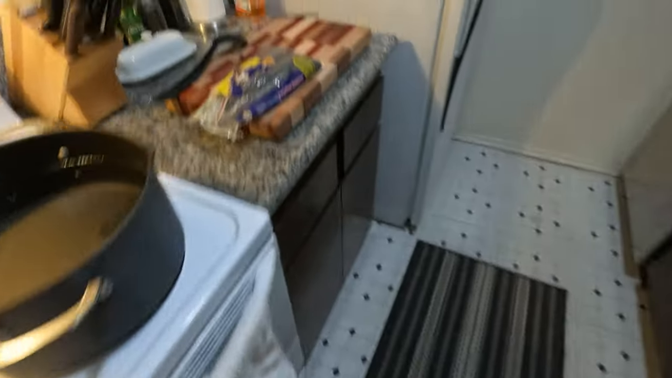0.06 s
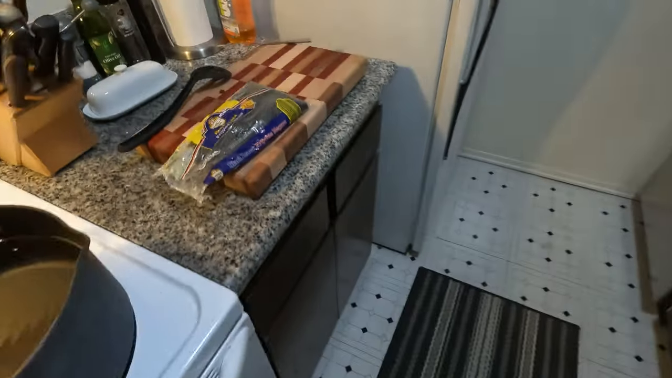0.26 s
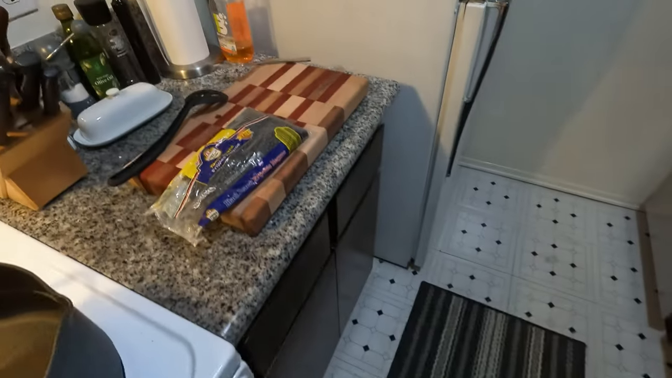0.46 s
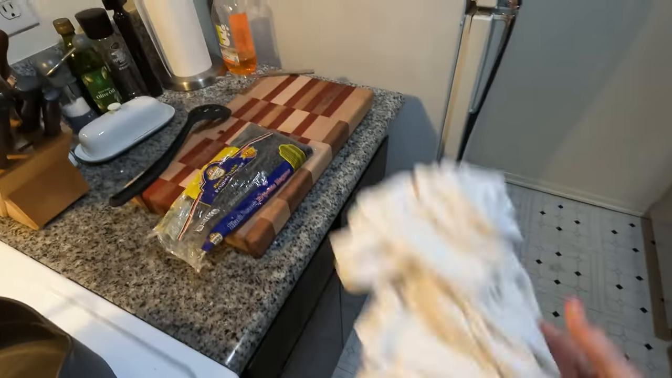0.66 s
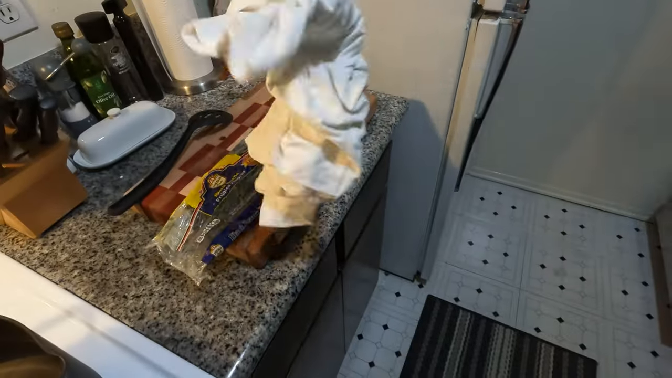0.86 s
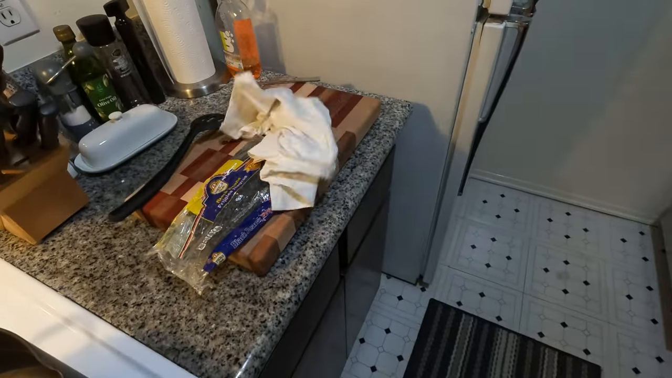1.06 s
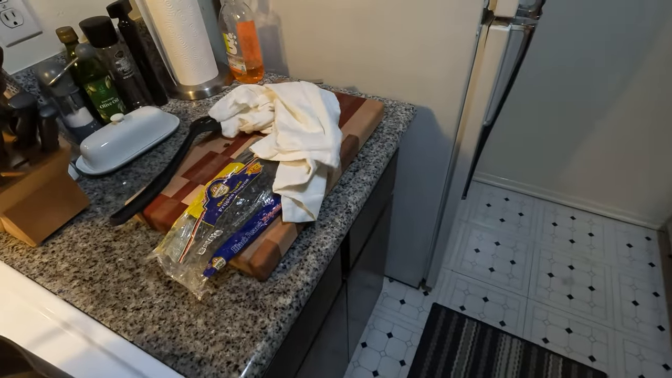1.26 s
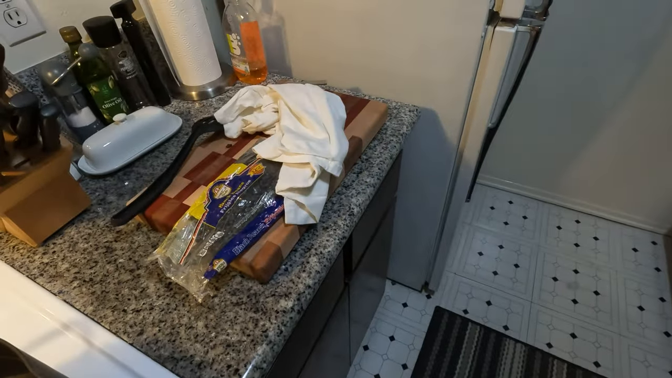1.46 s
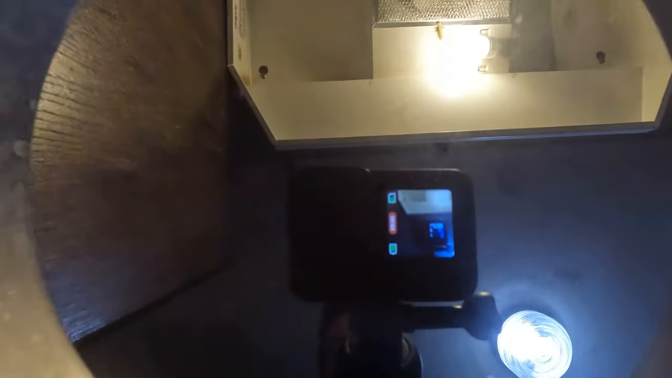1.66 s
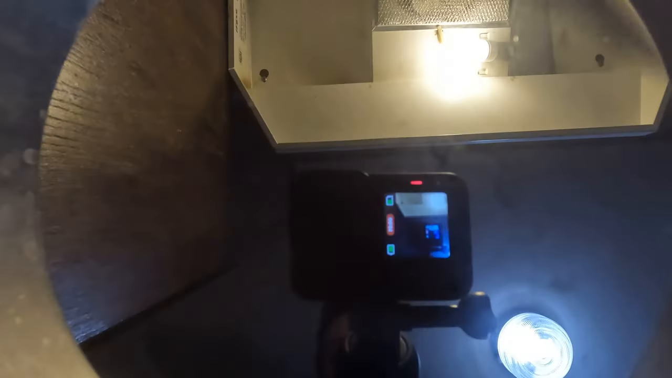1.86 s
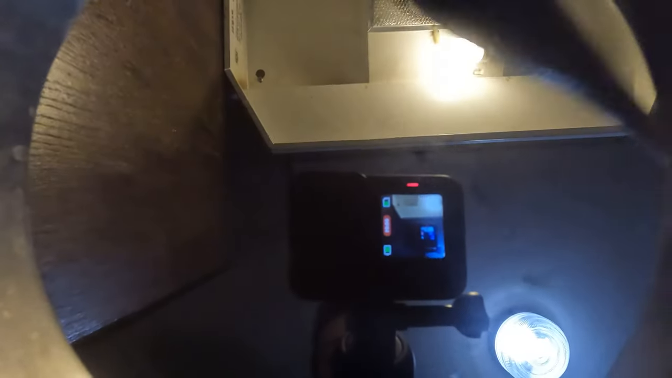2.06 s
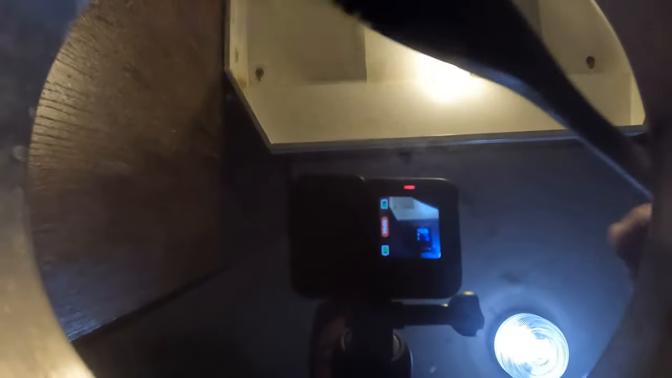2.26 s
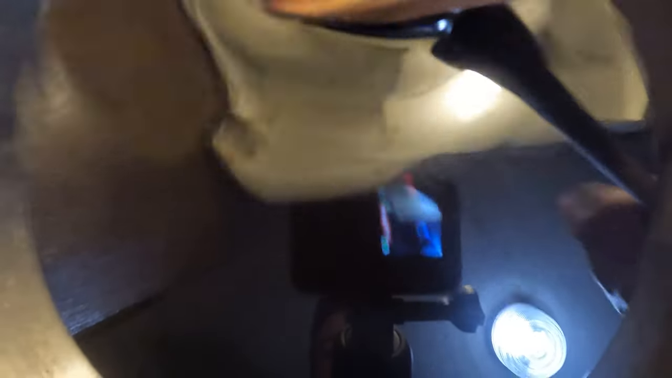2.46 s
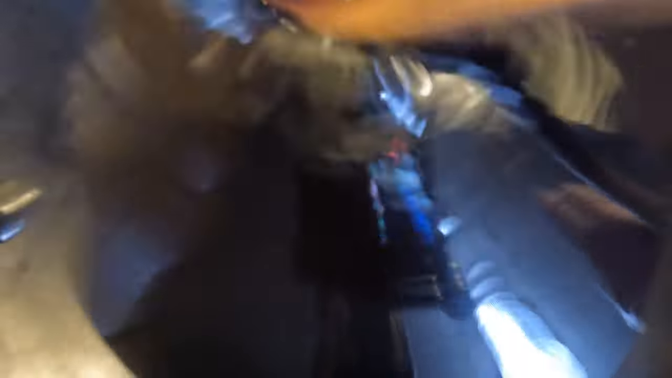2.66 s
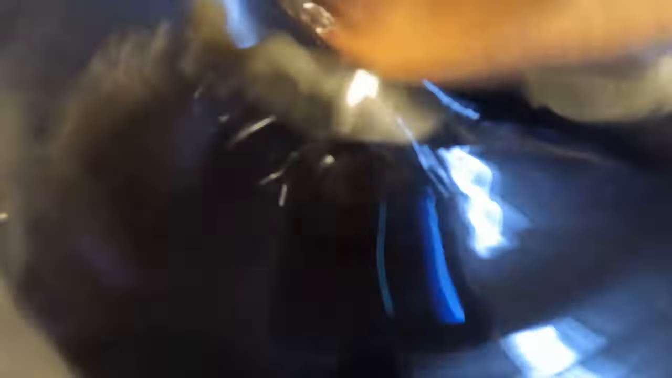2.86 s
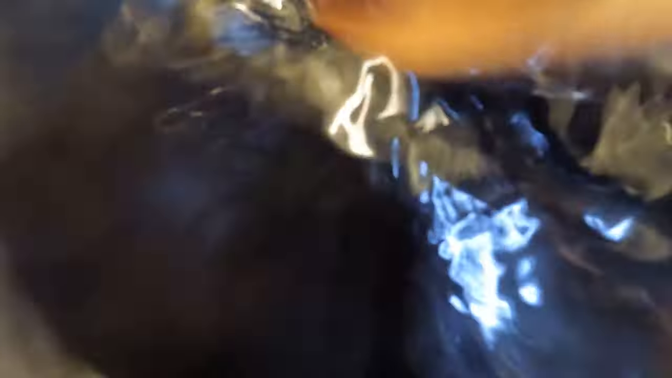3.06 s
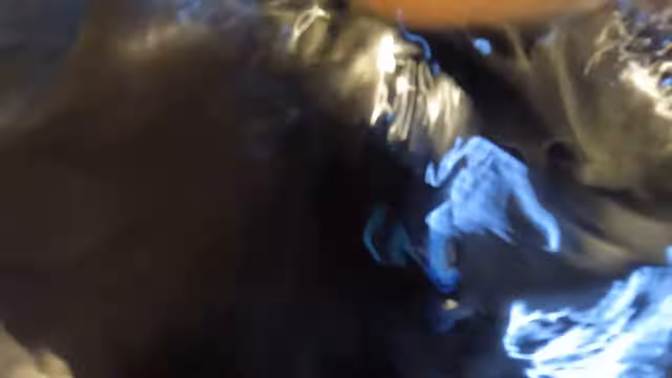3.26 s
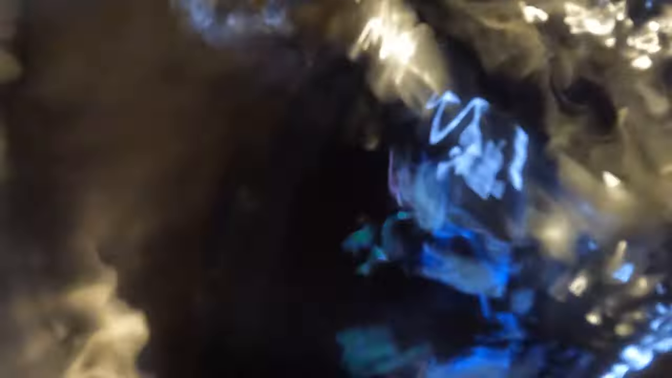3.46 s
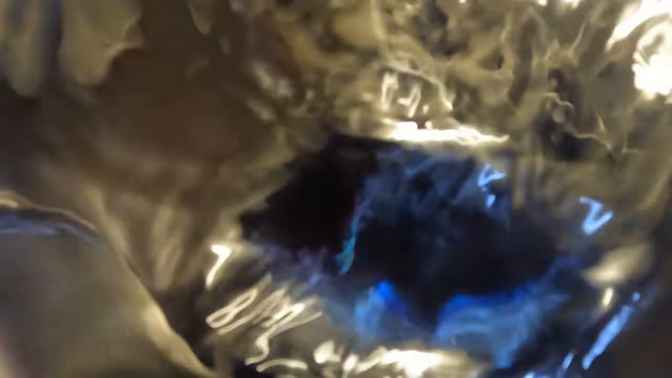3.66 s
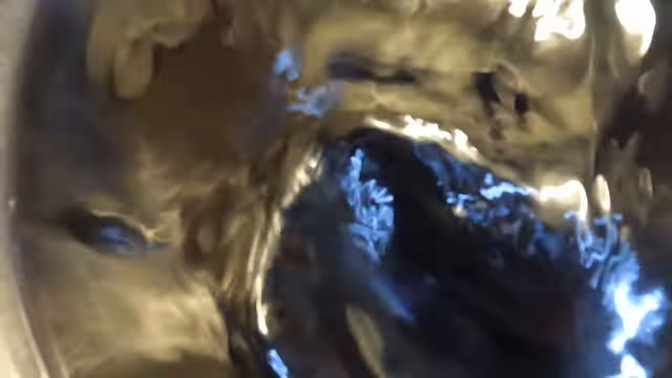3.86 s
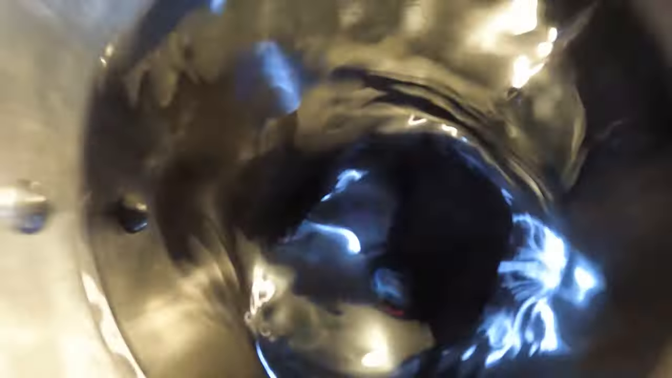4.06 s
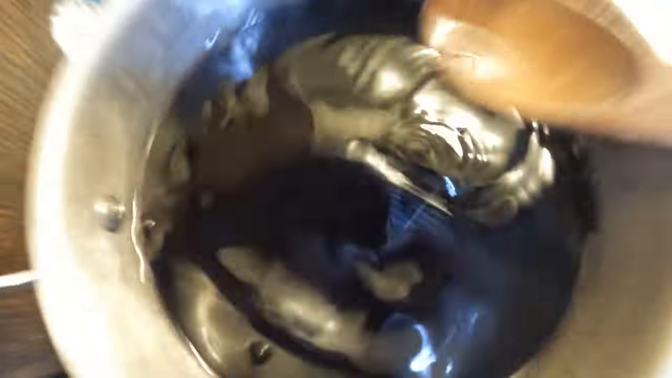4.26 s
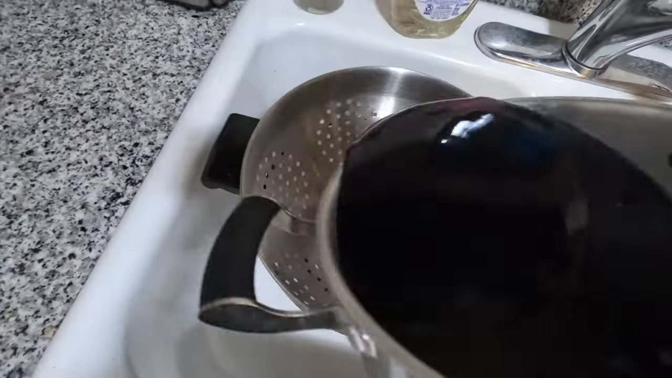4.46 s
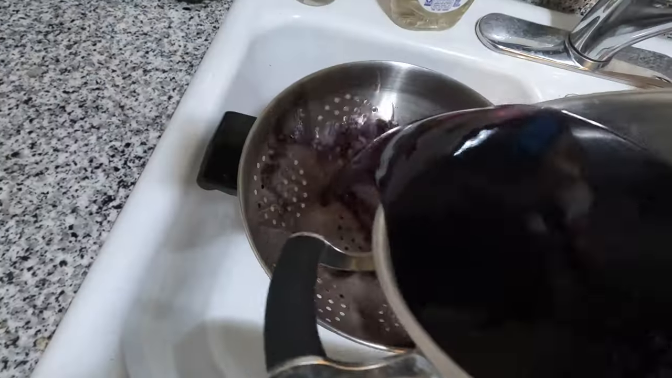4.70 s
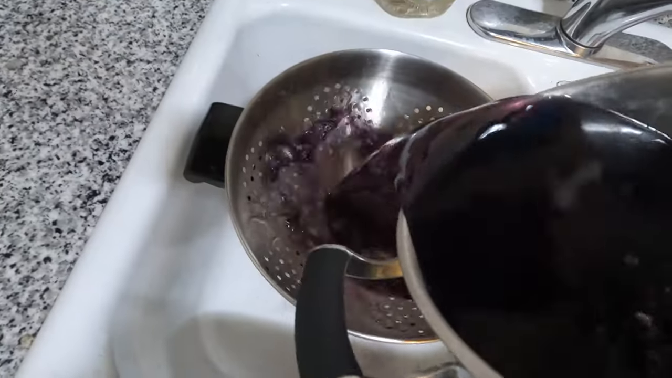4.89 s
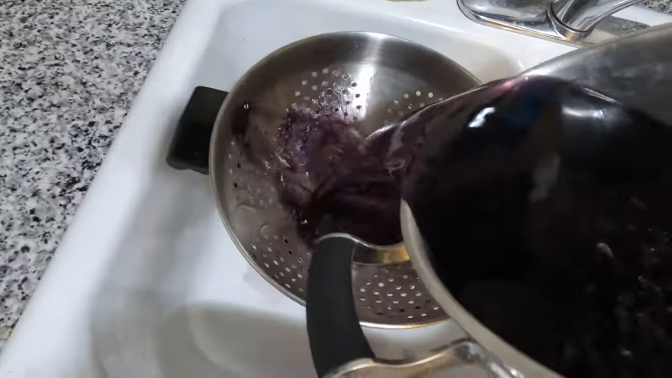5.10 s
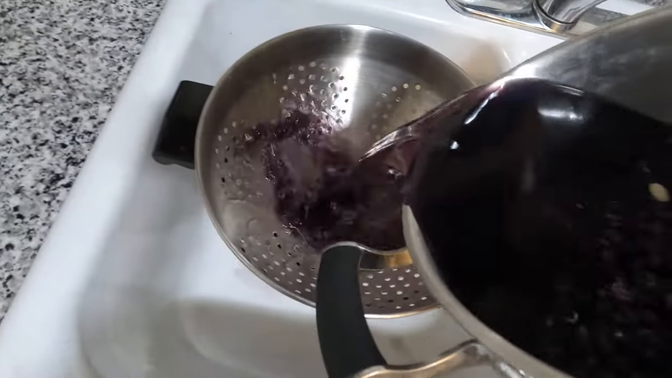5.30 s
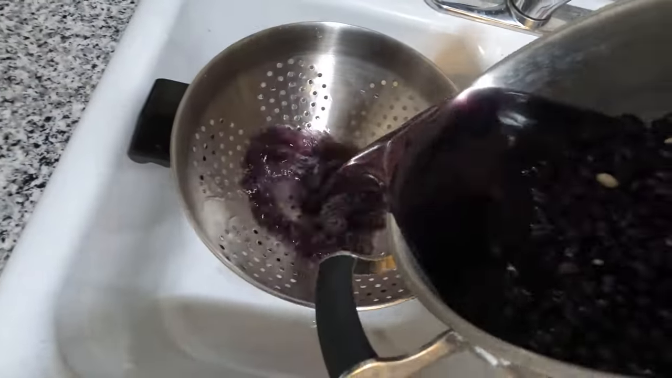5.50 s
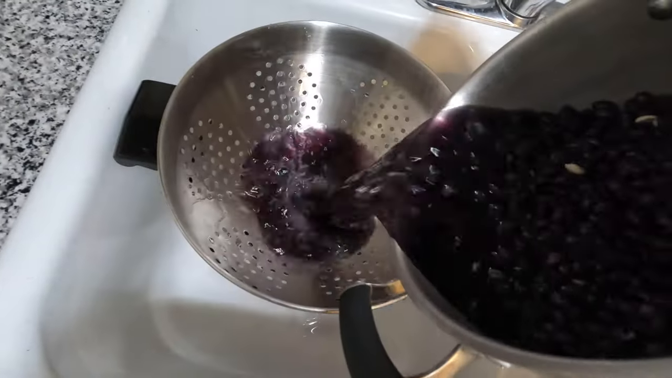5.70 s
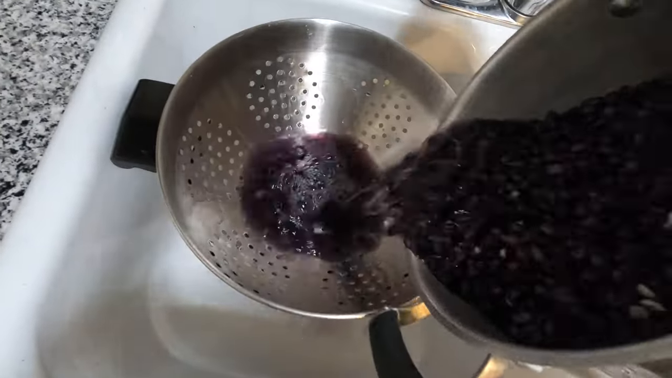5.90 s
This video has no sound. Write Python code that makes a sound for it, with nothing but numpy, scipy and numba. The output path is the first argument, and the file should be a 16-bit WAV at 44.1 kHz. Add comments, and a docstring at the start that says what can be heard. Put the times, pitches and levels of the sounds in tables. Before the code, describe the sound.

A towel slaps and thumps onto a kitchen counter, then a growing fan drone with watery plips inside a pot, then dark water pours through a steel colander.

```python
"""A kitchen in three moments, joined abruptly.
First a towel is tossed: cloth slaps and plastic crinkles (click clouds), a thumping board (decaying modes).
Then, inside a pot, a fan drone grows (coloured noise) while water plips (gliding sines) in soft fizz.
Last, after a faint click, the pot clanks on a steel colander (decaying modes) and bean water pours through
into the sink: swarms of ringing bubbles make the splash, the spray and the deep gulps of the stream."""
import sys
import numpy as np
from scipy import signal
from scipy.fft import rfft, irfft, next_fast_len
from scipy.io import wavfile
from scipy.ndimage import uniform_filter1d, map_coordinates
from numba import njit

SR = 44100
rng = np.random.default_rng(int(sys.argv[2]) if len(sys.argv) > 2 else 0)


def generate_wav(signal):
    """Clip the signal to [-1, 1] and save it as 16-bit WAV at the path in sys.argv[1]."""
    frames = np.transpose(np.atleast_2d(signal))
    scaled = np.clip(frames, -1, 1) * 32767
    pcm = np.round(scaled).astype(np.int16)
    wavfile.write(sys.argv[1], SR, pcm)


N = 261839
T = np.arange(N) / SR
POT_S, SINK_S = 1.652, 4.42  # the listening place moves into the pot, then to the sink


def amp(db):
    """Decibels to linear gain."""
    return 10 ** (np.asarray(db) / 20)


def unit(x):
    """Scale to an RMS of 1."""
    return x / np.sqrt(np.mean(x ** 2))


def noise(*channels):
    """White noise over the whole scene."""
    return rng.standard_normal((*channels, N))


def add(track, start_s, sound):
    """Mix a sound into a track at start_s."""
    i = max(int(start_s * SR), 0)
    track[i:i + len(sound)] += sound[:N - i]


def colour(x, points, peaks=()):
    """Filter by (Hz, dB) points, 36 dB/octave outside them, with resonances (Hz, width Hz, dB) on top."""
    size = next_fast_len(N + SR // 2, True)
    f = np.fft.rfftfreq(size, 1 / SR) + 0.00107  # keeps the log finite at 0 Hz
    hz, db = np.transpose(sorted(points))
    shape_db = np.interp(np.log(f), np.log(hz), db)
    octaves_outside = np.maximum(np.log2(hz[0] / f), np.log2(f / hz[-1]))
    shape_db -= 36 * np.maximum(0, octaves_outside)
    for centre_hz, width_hz, lift_db in peaks:
        shape_db += lift_db / (1 + (2 * (f - centre_hz) / width_hz) ** 2)
    return irfft(rfft(x, size) * amp(shape_db), size)[..., :N]


def decay(t, t60_s):
    """Exponential decay by 60 dB in t60_s."""
    return np.exp(-np.log(1000) * t / t60_s)


def swell(rise_s, t60_s):
    """Time axis and envelope of a sound that rises smoothly and dies away."""
    t = T[:int(SR * (1.2 * t60_s + rise_s))]
    return t, (1 - np.exp(-t / rise_s)) ** 2 * decay(t, t60_s)


def ramp(start_s, length_s):
    """Rise linearly from 0 to 1 over length_s."""
    return np.clip((T - start_s) / length_s, 0, 1)


def wander(hz):
    """Slow chance: random points at rate hz, joined by lines, with a spread near 1."""
    return 1.2 * np.interp(T * hz, np.arange(2000), rng.standard_normal(2000))


def bend(x, ratio):
    """Bend the pitch of a stereo sound by a changing playback ratio."""
    position = np.cumsum(ratio)
    return np.array([map_coordinates(side, [position], mode="mirror") for side in x])


def room(x, wet_db, t60, near_db, near_t60):
    """Close reflections and a longer, duller tail; they differ left and right except in the bass."""
    t = T[:SR * 3 // 4]
    mid, side = rng.standard_normal((2, len(t)))
    side = signal.sosfilt(signal.butter(2, 330, "high", fs=SR, output="sos"), side)
    pair = np.array([mid + side, mid - side]) / np.sqrt(2) * (t > .0012)
    near, tail = decay(t, near_t60), decay(t, t60)
    near, tail = near / np.linalg.norm(near), tail / np.linalg.norm(tail)
    dull_tail = signal.sosfilt(signal.butter(1, 6000, fs=SR, output="sos"), pair * tail)
    echo = amp(near_db) * pair * near + amp(wet_db) * dull_tail
    return x + signal.fftconvolve(np.atleast_2d(x), echo, axes=1)[:, :N]


def bursts(table, grain_db, spread):
    """Each row (s, dB, Hz, rise s, t60 s) is a quick cloud of tiny clicks around its own pitch."""
    out = np.zeros(N)
    for start_s, db, hz, rise_s, t60_s in table:
        t, envelope = swell(rise_s, t60_s)
        grain_gain = np.repeat(amp(grain_db * rng.standard_normal(SR // 49)), 49)
        clicks = rng.standard_normal(SR) * grain_gain
        edges = [hz / (1 + spread), min(hz * (1 + spread), SR * .45)]
        band = signal.butter(2, edges, "band", fs=SR, output="sos")
        cloud = unit(signal.sosfilt(band, clicks))
        add(out, start_s, amp(db) * np.resize(cloud, len(t)) * envelope)
    return out


def tones(table, rise, glide):
    """Each resonance (s, Hz, dB, t60 s) is a decaying sine; its pitch shifts by the share glide over t60."""
    out = np.zeros(N)
    for start_s, hz, db, t60_s in table:
        t, envelope = swell(rise, t60_s)
        add(out, start_s, amp(db) * envelope * np.sin(2 * np.pi * hz * t * (1 + glide * t / t60_s / 2)))
    return out


@njit
def ring_grains(start, hz, t60, size, glide):
    """Many short decaying sines whose pitch rises as they fade."""
    y = np.zeros(N)
    for k in range(len(start)):
        n = int(t60[k] * SR)
        w = 2 * np.pi * hz[k] / SR
        p, bend, z = np.exp(-6.9 / n + 1j * w), np.exp(1j * w * glide / n), size[k] + 0j
        for i in range(start[k], min(start[k] + n, N)):
            z *= p
            p *= bend
            y[i] += z.imag
    return y


def bubbles(rate, low_hz, high_hz, cycles, scatter_db, glide):
    """Bubbles of all sizes at random times, each ringing for a similar number of cycles."""
    when, pitch, strength, length = rng.random((int(rate * N / SR), 4)).T
    hz = low_hz * (min(high_hz, SR / 3) / low_hz) ** pitch
    size = hz * amp(scatter_db * np.minimum(-np.log(strength), 4))
    t60_s = cycles * (.5 + length) / hz
    return unit(ring_grains((when * N).astype(np.int64), hz, t60_s, size, glide))


def swarm(rate, low_hz, high_hz, cycles, scatter_db, glide, width):
    """Bubbles across the basin reach the two microphones with unlike strength and sign."""
    mid, side = (bubbles(rate / 2, low_hz, high_hz, cycles, scatter_db, glide) for _ in range(2))
    return np.array([mid + width * side, mid - width * side])


# kitchen hum spectrum: pitch_hz, relative_db_per_hz
HUM_SPECTRUM = [(50, -1), (85, 3), (142, -3), (219, 2), (302, -9.5), (455, -7), (541, -16.5), (615, -13),
                (868, -22), (1030, -19), (1120, -20.5), (2100, -31.5), (7630, -44.5), (8600, -52.5),
                (12500, -55.5), (14500, -83)]
HUM_DB = -39.5


def kitchen_hum():
    """Steady coloured noise in a hard-walled room."""
    hum = room(colour(noise(), HUM_SPECTRUM), wet_db=-19.0, t60=0.27, near_db=-11.0, near_t60=0.097)
    return amp(HUM_DB) * unit(hum)


# fan rumble spectrum: pitch_hz, relative_db_per_hz
FAN_RUMBLE = [(15, -49), (25, -7.5), (70, -9), (82, -9.5), (102, 0), (206, -4), (244, -1.5), (270, -13.5),
              (305, -10), (332, -5.5), (356, -12.5), (501, -11), (605, -25), (694, -17), (1500, -40.5),
              (1950, -74), (3300, -120)]
# fan hiss spectrum: pitch_hz, relative_db_per_hz
FAN_HISS = [(590, -20), (1000, -3), (1770, -9.5), (1960, -8.5), (2370, -12), (2650, -11), (8120, -32),
            (11100, -46), (12300, -33), (14500, -63)]
RUMBLE_DB, RUMBLE_FULL_S, RUMBLE_GROWTH_DB_PER_S = -38.5, 3.55, 8.5
HISS_DB, HISS_GROWTH_DB_PER_S, HISS_FLOOR_DB = -57.5, 8, -77.5


def fan_drone():
    """Noise heard in the pot: the rumble grows, then holds; the hiss grows out of its floor."""
    rumble_db = RUMBLE_DB - RUMBLE_GROWTH_DB_PER_S * np.maximum(RUMBLE_FULL_S - T, 0)
    hiss_db = HISS_DB - HISS_GROWTH_DB_PER_S * np.maximum(SINK_S - T, 0)
    rumble = amp(rumble_db) * unit(colour(noise(), FAN_RUMBLE))
    hiss = np.hypot(amp(HISS_FLOOR_DB), amp(hiss_db)) * unit(colour(noise(), FAN_HISS))
    return rumble + hiss


SINK_AIR_DB = -50


def sink_air():
    """The fan's hiss as it reaches the sink, independent left and right."""
    return amp(SINK_AIR_DB) * unit(colour(noise(2), FAN_HISS))


# drumming sink spectrum: pitch_hz, relative_db_per_hz
SINK_SPECTRUM = [(20, -20), (45, -1.5), (70, -11.5), (102, 5), (130, -11.5), (158, -1.5), (195, -8.5),
                 (250, -5.5), (330, -6), (390, -10.5), (500, -16.5), (800, -19.5)]
DRUM_DB = -37


def sink_drumming():
    """The sink's body drums under the water: low coloured noise."""
    drum = room(colour(noise(), SINK_SPECTRUM), wet_db=-3.5, t60=0.36, near_db=-21, near_t60=0.18)
    return amp(DRUM_DB) * unit(drum)


# jolts of the hand-held microphone: start_s, level_db, rise_s
JOLTS = [(0.175, -5, 0.019), (0.535, -14.5, 0.01), (0.642, -21, 0.011), (0.959, -18, 0.0097),
         (1.07, -14, 0.0065)]
JOLT_HZ, JOLT_T60_PER_RISE = 26.35, 27  # a slower push also dies away more slowly
GRIP_DB = -51


def handling():
    """The hand rumbles faintly; each jolt rocks the microphone at a very low pitch."""
    out = amp(GRIP_DB) * unit(colour(noise(), [(15, -10), (28, 13), (50, -12)]))
    for start_s, db, rise_s in JOLTS:
        t, envelope = swell(rise_s, JOLT_T60_PER_RISE * rise_s)
        add(out, start_s, amp(db) * envelope * np.sin(2 * np.pi * JOLT_HZ * t))
    return out


# board knocks on the stone counter: start_s, level_db, centre_hz
KNOCKS = [(0.967, -22.5, 1120), (0.97, -32, 2100), (0.989, -28, 1050), (1.057, -28, 1130),
          (1.16, -28, 1400), (1.24, -36, 1500), (1.335, -34, 950), (1.409, -35, 1720)]
KNOCK_RISE_S, KNOCK_T60_S = 0.0015, 0.037


def board_knocks():
    """Hard, brief contacts of board and stone."""
    hits = [(s, db, hz, KNOCK_RISE_S, KNOCK_T60_S) for s, db, hz in KNOCKS]
    return room(bursts(hits, grain_db=1.5, spread=0.26), wet_db=-10, t60=0.46, near_db=1, near_t60=.03)


# clinks of things on the counter: start_s, pitch_hz, level_db, t60_s
CLINKS = [(0.07, 3110, -30, 0.035), (0.07, 3794, -40, .1), (0.187, 1190, -32, 0.012),
          (0.187, 2400, -29, 0.01), (0.877, 3400, -39.5, 0.072), (1.047, 2520, -29, 0.028),
          (1.047, 1240, -33, 0.036)]


def clinks():
    """Small hard things ring briefly."""
    return tones(CLINKS, rise=0.00032, glide=0)


# towel folds and other soft blows: start_s, thump_db, contact_s, slap_db
THUMPS = [(0.085, -18.5, 0.0039, -44.5), (0.806, -32, 0.0034, -29.5), (0.846, -30.5, 0.00029, -35.5),
          (0.968, -8.5, 0.0005, -34.5), (0.99, -10, 0.00076, -40), (1.049, -15.5, 0.0062, -28.5),
          (1.064, -16.5, .0018, -30), (1.146, -11.5, 0.002, -30), (1.16, -15, 0.0019, -31),
          (1.22, -20, 0.0011, -39), (1.238, -23.5, 0.00091, -33), (1.294, -23, 0.0013, -42),
          (1.329, -21, 0.0032, -37.5)]
# board and counter modes: pitch_hz, level_db, t60_s
BOARD = [(53, -18.5, 0.57), (87, 0, 0.18), (104.6, -11, 0.58), (178, -3.5, 0.063), (256, -2, 0.11),
         (345, -17, 0.09), (467, -14, 0.25), (642, -15, 0.15), (1012, -11, 0.083)]


def board_thumps():
    """Soft blows ring the board and shake loose things on it; longer contact leaves only low modes."""
    out = np.zeros(N)
    for start_s, db, contact_s, _ in THUMPS:
        for hz, mode_db, t60_s in BOARD:
            t, envelope = swell(2 * contact_s, t60_s)
            # each mode's pitch varies a little by chance at each blow
            varied_hz = hz * (1 + 0.0155 * rng.standard_normal())
            softness = np.hypot(1, 2 * hz * contact_s)
            add(out, start_s, amp(db + mode_db) * envelope * np.sin(2 * np.pi * varied_hz * t) / softness)
    shakes = [(s, db - 12.5, 170, .003, .22) for s, db, _, _ in THUMPS]
    shudder = bursts(shakes, grain_db=4.0, spread=1.44)
    return room(out + shudder, wet_db=-19.0, t60=0.34, near_db=-33, near_t60=0.093)


# plastic crinkles and ticks: start_s, level_db, centre_hz, t60_s
CRINKLES = [(0.067, -29, 3060, 0.16), (0.186, -29.5, 2000, 0.029), (0.201, -48.5, 3530, 1),
            (0.809, -43, 5400, 0.21), (0.845, -44, 4200, 0.39), (1.065, -28.5, 4000, 0.13),
            (1.103, -41, 4900, 0.22), (1.139, -41.5, 4280, 0.37), (1.375, -42, 4350, .027)]
# sliding cloth: start_s, level_db, centre_hz, rise_s, t60_s
SWISHES = [(0.0, -40.5, 1260, 0.00068, 0.91), (0.411, -22.5, 2450, 0.074, 0.27),
           (0.466, -20.5, 4600, 0.059, 0.18), (1.24, -43.5, 1130, 0.0022, 1.33)]
# towel and bag colour: pitch_hz, gain_db
CLOTH = [(100, 1.5), (950, 0.5), (1800, -5), (3000, -3.5), (5000, -6.5), (7300, -6), (9000, -11),
         (15000, -5)]
CRINKLE_RISE_S = 0.001
SLAP_HZ, SLAP_RISE_S, SLAP_T60_S, SLAP_LEAD_S = 1050, 0.00052, 0.28, .003  # just ahead of every blow


def towel_and_bag():
    """Cloth slaps and slides and plastic crinkles, as clouds of tiny clicks."""
    slaps = [(s - SLAP_LEAD_S, db, SLAP_HZ, SLAP_RISE_S, SLAP_T60_S) for s, _, _, db in THUMPS]
    crinkles = [(s, db, hz, CRINKLE_RISE_S, t60_s) for s, db, hz, t60_s in CRINKLES]
    return colour(bursts(slaps + crinkles + SWISHES, grain_db=3.0, spread=0.8), CLOTH)


def towel_toss():
    """Rustles, clinks, thumps and knocks over the hum."""
    rustle = room(towel_and_bag() + clinks(), wet_db=-2.0, t60=0.76, near_db=0, near_t60=0.0098)
    return kitchen_hum() + rustle + board_thumps() + board_knocks() + handling()


# soft lead-ins and fizz around the plips: start_s, level_db, centre_hz
FIZZ = [(3.428, -48, 2400), (3.53, -61, 11500), (3.595, -66, 12000), (3.817, -41, 1800),
        (3.904, -50, 13000), (3.91, -62, 5700), (3.946, -58, 5600)]
FIZZ_RISE_S, FIZZ_T60_S = 0.0042, 0.078
# ringing parts of plips in the pot: start_s, ring_hz, ring_db, tick_db
PLIPS = [(2.974, 5530, -52.5, -67), (3.234, 2000, -38, -60), (3.443, 2270, -25.5, -38),
         (3.446, 1710, -27, -52), (3.444, 3170, -35, -45), (3.445, 800, -24.5, -35),
         (3.448, 920, -25.5, -44), (3.472, 717, -32, -44), (3.492, 790, -36, -54), (3.512, 910, -38, -54),
         (3.812, 4760, -40, -62), (3.816, 5740, -35, -65), (3.816, 1600, -42, -60),
         (3.8317, 1706, -14.5, -36), (3.8315, 5830, -36, -44), (3.853, 5800, -44, -49),
         (3.862, 1610, -29, -56), (3.863, 4950, -45, -49), (3.893, 5430, -46, -53),
         (3.903, 5300, -24, -32.5), (3.951, 5900, -39, -55), (4.249, 3540, -35, -45)]
PLIP_CYCLES, PLIP_GLIDE = 49, 0.0065  # ring time in cycles; share by which the pitch rises meanwhile
TICK_PITCH_RATIO, TICK_RISE_S, TICK_T60_S = 1.1, 0.00039, 0.019  # ticks are brighter than their rings
WASH_DB, WASH_RISE_S, WASH_T60_S = -23.5, 0.0022, 0.25  # level against the tick


def pot_water():
    """Each part ticks, rings and leaves a soft wash; several make one plip; soft fizz surrounds them."""
    rings = [(s, hz, db, PLIP_CYCLES / hz) for s, hz, db, _ in PLIPS]
    ticks = [(s, db, TICK_PITCH_RATIO * hz, TICK_RISE_S, TICK_T60_S) for s, hz, _, db in PLIPS]
    washes = [(s, db + WASH_DB, hz, WASH_RISE_S, WASH_T60_S) for s, hz, _, db in PLIPS]
    fizz = [(s, db, hz, FIZZ_RISE_S, FIZZ_T60_S) for s, db, hz in FIZZ]
    water = tones(rings, rise=0.00042, glide=PLIP_GLIDE)
    water += bursts(ticks, grain_db=8.0, spread=0.48)
    water += bursts(washes + fizz, grain_db=2.5, spread=0.42)
    return room(water, wet_db=-5.5, t60=0.22, near_db=-2.5, near_t60=0.021).mean(axis=0)


def inside_pot():
    """Drone and water, the same left and right."""
    return fan_drone() + pot_water()


# pot knocks on the colander: start_s, level_db
CLANKS = [(4.523, -0.5), (4.545, -16)]
# wet steel modes: pitch_hz, level_db, t60_s
STEEL = [(637, -28, 0.054), (1162, -11, 0.068), (1365, -12.5, .06), (1890, -27, 0.063),
         (2386, -14.5, 0.053), (5292, -28, 0.054)]
RATTLE_SHARE, RATTLE_HZ = .3, 220


def clank():
    """The pot's rim chatters on the colander; the wet steel rings briefly and sinks in pitch."""
    rings = [(s, hz, db + mode_db, t60_s) for s, db in CLANKS for hz, mode_db, t60_s in STEEL]
    return tones(rings, rise=0.0027, glide=-0.024) * (1 + RATTLE_SHARE * wander(RATTLE_HZ))


# two low pot bumps, then spills and surges of water: start_s, level_db, centre_hz, t60_s
SPLATS = [(4.472, -20.5, 146, 0.16), (4.488, -24.5, 323, 0.12), (4.519, -30, 5360, 0.16),
          (4.518, -23, 1480, 0.13), (4.526, -24, 720, 0.087), (4.543, -21, 790, 0.067),
          (4.604, -44.5, 5400, 0.11), (4.655, -32.5, 4250, 0.083), (4.704, -26, 4760, 0.1),
          (4.756, -28.5, 6300, 0.067), (4.811, -21.5, 3840, 0.1), (4.89, -33, 6840, .09),
          (4.931, -23, 1520, 0.068), (5.33, -25, 1400, .06), (5.547, -19, 2600, 0.044),
          (5.666, -26, 2400, 0.052), (5.696, -23.5, 3220, 0.087), (5.758, -17.5, 3178, 0.072),
          (5.893, -26.5, 1400, .12)]
SPLAT_RISE_S = 0.0041


def bumps_and_splats():
    """Bumps and spills as narrow bursts of clicks."""
    hits = [(s, db, hz, SPLAT_RISE_S, t60_s) for s, db, hz, t60_s in SPLATS]
    return bursts(hits, grain_db=1.0, spread=0.24)


STREAM_S, STREAM_RISE_S = 4.64, 0.1  # the unbroken stream follows the first spill
# air pocket under the plunging stream: time_s, pitch_hz, level_db
GURGLE = [(4.85, 499, -51), (4.882, 525.5, -39), (4.97, 522.7, -52), (5.012, 597.7, -49), (5.042, 597, -35),
          (5.072, 584.4, -43), (5.086, 570, -31.5), (5.2, 591, -34), (5.262, 592.7, -33),
          (5.312, 504.8, -29), (5.352, 550, -41), (5.366, 587, -36), (5.426, 509.3, -42),
          (5.46, 497.5, -23.5), (5.486, 487.6, -41), (5.528, 512.8, -36), (5.556, 502, -35),
          (5.592, 561.5, -37), (5.674, 526.3, -27.5), (5.736, 577, -33.5), (5.772, 489.5, -43),
          (5.8, 545.3, -31), (5.89, 549, -33.5), (5.93, 498, -31)]
# churning spectrum: pitch_hz, relative_db_per_hz
CHURN = [(330, -18), (440, -8), (510, -2), (550, 1.5), (600, -1), (660, -11), (760, -24), (1000, -16)]
CHURN_DB, CHURN_HZ = -1.5, 550  # level against the gurgle; resting pitch


def gurgle():
    """Churning deep bubbles follow the air pocket in pitch and strength."""
    deep = swarm(rate=600, low_hz=390, high_hz=1001, cycles=18, scatter_db=1.2, glide=0.11, width=0.6)
    time_s, pitch_hz, level_db = np.transpose(GURGLE)
    churn = unit(bend(colour(deep, CHURN), np.interp(T, time_s, pitch_hz) / CHURN_HZ))
    return churn * amp(CHURN_DB + np.interp(T, time_s, level_db)) * ramp(STREAM_S, STREAM_RISE_S)


# loudest bubbles and gulps: start_s, pitch_hz, level_db, glide_share
GULPS = [(4.612, 1260, -32, -0.0055), (4.643, 1220, -29.5, -0.013), (4.668, 1180, -24.5, -0.086),
         (4.706, 1150, -33, -.03), (4.679, 4170, -29, -0.0075), (4.706, 507, -25.5, 0.09),
         (5.034, 614, -19, -0.076), (5.082, 580, -18.5, -0.0048), (5.162, 583, -22, 0.058),
         (5.244, 607, -18, -0.043), (5.275, 540, -21, -0.16), (5.299, 480, -25.5, -.1),
         (5.364, 589, -25, 0.038), (5.452, 503, -19.5, -.12), (5.548, 485, -15.5, -0.041),
         (5.55, 619, -17, 0.04), (5.585, 814, -18, -0.019), (5.613, 605, -19, -.04),
         (5.63, 468.9, -20, 0.091), (5.676, 525, -16, 0.076), (5.717, 602, -16, 0.098),
         (5.745, 468, -21.5, -0.18), (5.8, 3060, -12, .02), (5.82, 1170, -22, .05),
         (5.833, 484, -20, 0.044), (5.868, 622, -20.5, -0.05)]
GULP_T60_S, GULP_REF_HZ, GULP_DAMPING = 0.078, 553, 0.3  # ring time at the reference pitch


def gulps():
    """Large trapped bubbles ring and glide; smaller ones die sooner."""
    out = np.zeros(N)
    for start_s, hz, db, glide in GULPS:
        t60_s = GULP_T60_S * (GULP_REF_HZ / hz) ** GULP_DAMPING
        out += tones([(start_s, hz, db, t60_s)], rise=.003, glide=glide)
    return out


SPUTTERS_PER_S, SPUTTER_DB, SPUTTER_SCATTER_DB = 60, -7, 1  # level against the spray gain
SPUTTER_LOW_HZ, SPUTTER_HIGH_HZ, SPUTTER_LENGTH_S = 1440, 6000, 0.014


def sputters(count=5):
    """Clumps of drops land at random; each traps a handful of bubbles around its own pitch."""
    u = rng.random((int(SPUTTERS_PER_S * N / SR), 3, count))
    start = u[:, 0, :1] * N + u[:, 1] * SPUTTER_LENGTH_S * SR
    clump_hz = SPUTTER_LOW_HZ * (SPUTTER_HIGH_HZ / SPUTTER_LOW_HZ) ** u[:, 0, 1:2]
    hz = (clump_hz * (1 + .2 * (u[:, 2] - .5))).ravel()
    size = np.sqrt(hz) * amp(SPUTTER_SCATTER_DB * rng.standard_normal(len(hz)))
    return amp(SPUTTER_DB) * unit(ring_grains(start.astype(np.int64).ravel(), hz, 70 / hz, size, 0.093))


# strength of the stream: time_s, flow_db
FLOW = [(4.6, -40), (4.71, -33), (4.832, -28), (5.2, -34), (5.35, -34), (5.41, -36), (5.45, -32.5),
        (5.65, -37), (5.7, -30), (5.752, -35), (5.766, -27), (5.93, -26)]
FLUTTER_HZ, FLUTTER_DB = 34.07, 1.66  # the stream breaks into slugs
COVERED_S, COVER_TIME_S, BARE_SPLASH_DB, BARE_SPRAY_DB = 4.93, 0.13, -9.5, -0.5  # until water covers the steel
SPLASH_DB, SPRAY_DB = -3.5, -5.5  # against the flow
SPRAY_FADE_DB_PER_S = 1.5  # the deepening pool softens the spray


def stream_gains():
    """Splash and spray follow the flow as water covers the steel and gathers in a pool."""
    flow_db = np.interp(T, *np.transpose(FLOW)) + FLUTTER_DB * wander(FLUTTER_HZ)
    flow = amp(flow_db) * ramp(STREAM_S, STREAM_RISE_S)
    bare = 1 - ramp(COVERED_S - COVER_TIME_S, COVER_TIME_S)
    fade_db = SPRAY_FADE_DB_PER_S * np.maximum(T - COVERED_S, 0)
    splash_gain = flow * amp(SPLASH_DB + BARE_SPLASH_DB * bare)
    spray_gain = flow * amp(SPRAY_DB + BARE_SPRAY_DB * bare - fade_db)
    return splash_gain, spray_gain


# splash spectrum: pitch_hz, relative_db_per_hz
SPLASH = [(440, -22), (750, -17), (801, -27), (872, -2), (995, -3), (1390, -1), (1750, 0.5), (1920, -1.5),
          (2460, 2.5), (2790, -1), (3600, -4.5), (4680, -50), (7920, -120)]
# spray spectrum: pitch_hz, relative_db_per_hz
SPRAY = [(1760, -39), (3000, -8.5), (3930, -2.5), (4150, -9.5), (4830, -6.5), (5160, -9), (6120, -10.5),
         (9160, -21), (12700, -27.5), (13800, -31), (14500, -42)]
# wet colander resonances: pitch_hz, width_hz, lift_db
COLANDER = [(973, 23, 14), (1170, 90, 4.5), (1640, 210, 1), (2480, 110, -1), (3060, 77, 3.5),
            (3800, 27, -10), (3830, 110, -3), (4520, 170, 5.5), (4900, 70, 1), (6050, 120, 2)]
WAVER_HZ, WAVER_SHARE = 6, .018  # the splash's pitch wavers slowly at random by this share


def splash_and_spray():
    """The stream shatters on perforated steel into small bubbles and drops, coloured by the colander."""
    splash_gain, spray_gain = stream_gains()
    small = swarm(rate=2200, low_hz=662.4, high_hz=4267, cycles=58, scatter_db=3.0, glide=0.084, width=0.67)
    drops = swarm(rate=5000, low_hz=2400, high_hz=14270, cycles=91, scatter_db=2.5, glide=0.1, width=0.85)
    splash = unit(bend(colour(small, SPLASH, COLANDER), 1 + WAVER_SHARE * wander(WAVER_HZ)))
    spray = unit(colour(drops, SPRAY, COLANDER))
    clumps = np.array([sputters(), sputters()])
    water = splash_gain * splash + spray_gain * (spray + clumps)
    return room(water, wet_db=-13.5, t60=0.47, near_db=0.5, near_t60=0.092)


def pour():
    """The stream shatters on the steel, churns in the pool and drums on the sink."""
    strikes = room(bumps_and_splats() + clank(), wet_db=-20.0, t60=0.37, near_db=-5, near_t60=0.022)
    deep_water = room(gulps() + gurgle(), wet_db=-9, t60=.3, near_db=-10, near_t60=.03)
    return sink_air() + sink_drumming() + strikes + deep_water + splash_and_spray()


CLICK_DB = -25


def scene():
    """The three places follow each other abruptly, the last with a faint click."""
    in_pot, at_sink = (uniform_filter1d(1. * (T > s), size=128) for s in (POT_S, SINK_S))
    click = amp(CLICK_DB) * (np.arange(N) == int(SINK_S * SR))
    return towel_toss() * (1 - in_pot) + inside_pot() * (in_pot - at_sink) + pour() * at_sink + click


TOP_HZ = 14500


def record(dry):
    """The recorder cuts steeply above TOP_HZ."""
    return signal.sosfilt(signal.ellip(8, .2, 70, TOP_HZ, fs=SR, output="sos"), dry)


dry = scene()
out = record(dry)
generate_wav(out)
```